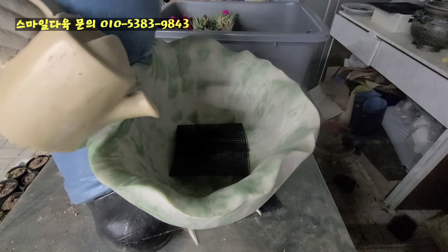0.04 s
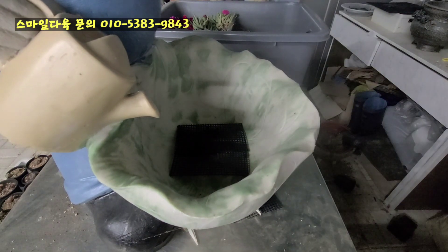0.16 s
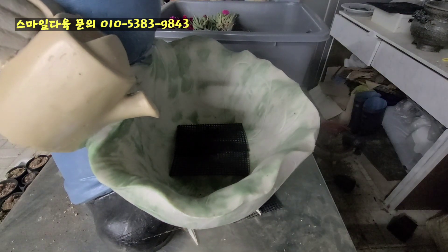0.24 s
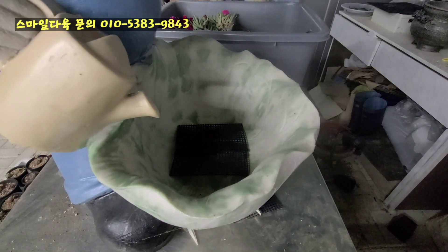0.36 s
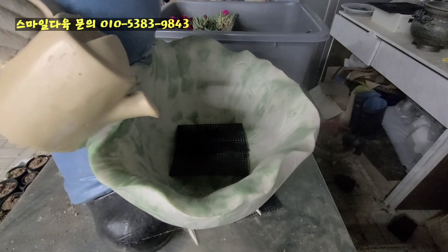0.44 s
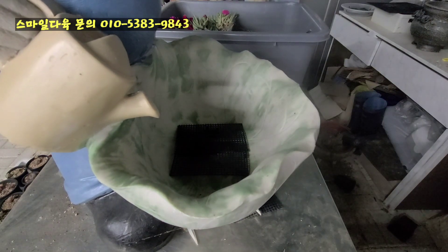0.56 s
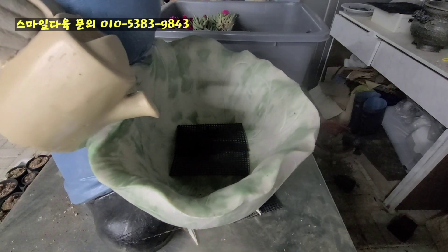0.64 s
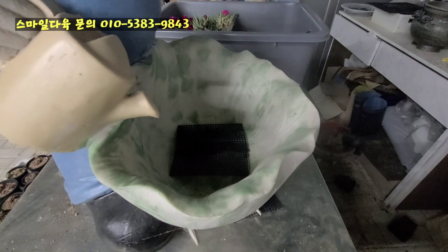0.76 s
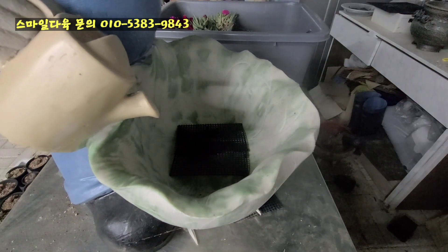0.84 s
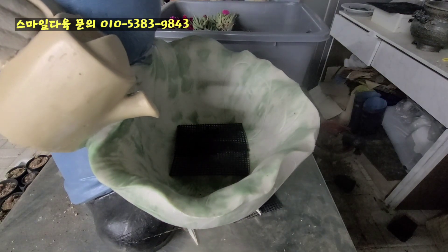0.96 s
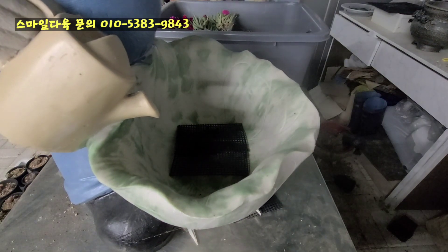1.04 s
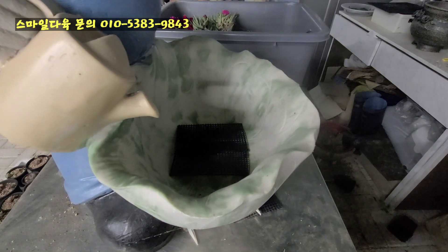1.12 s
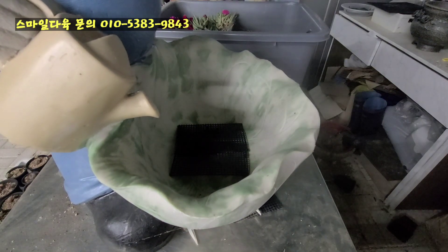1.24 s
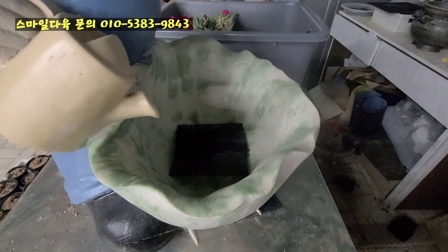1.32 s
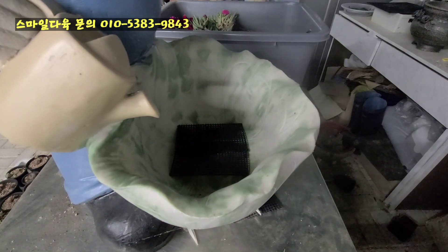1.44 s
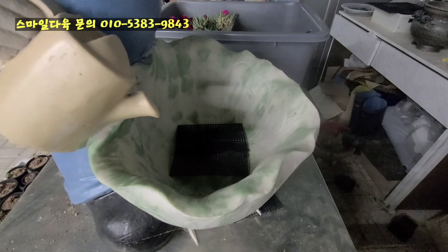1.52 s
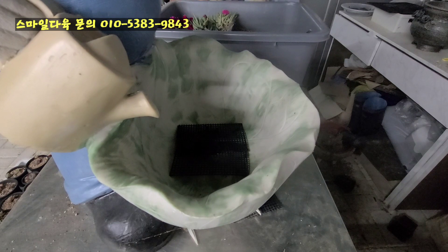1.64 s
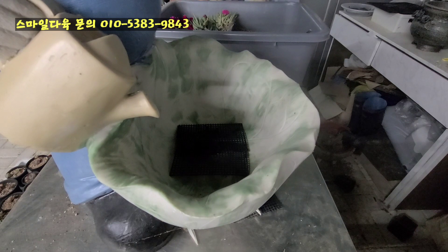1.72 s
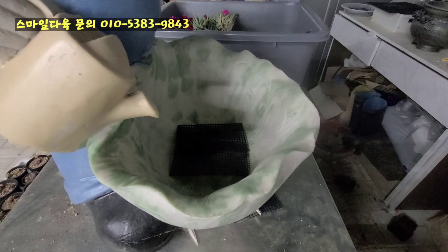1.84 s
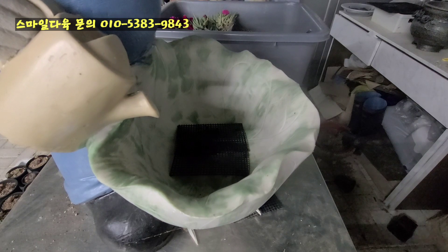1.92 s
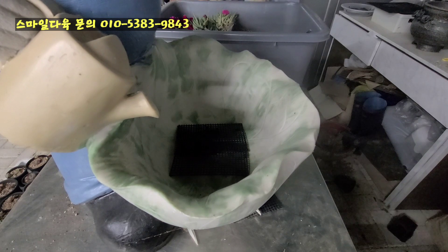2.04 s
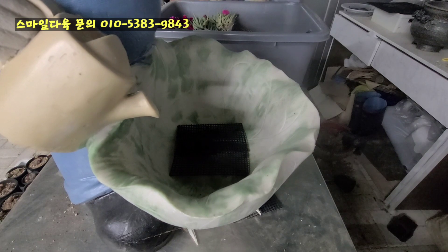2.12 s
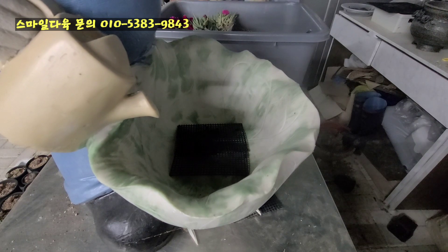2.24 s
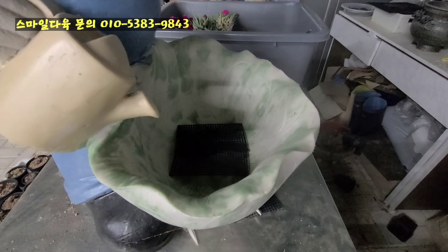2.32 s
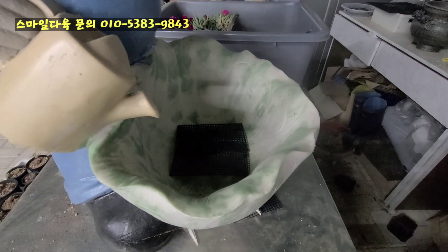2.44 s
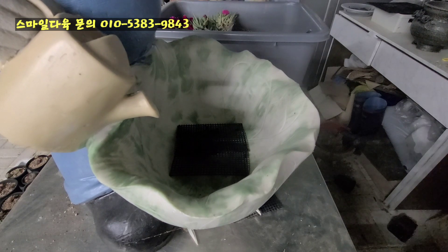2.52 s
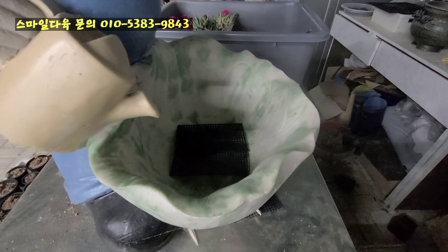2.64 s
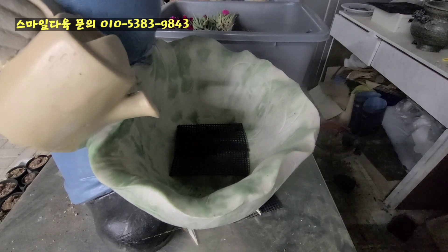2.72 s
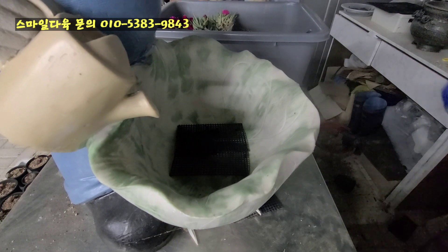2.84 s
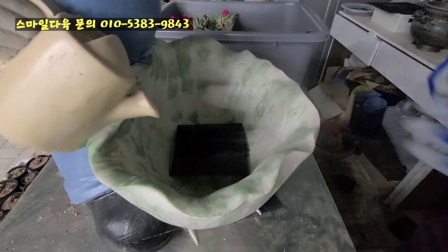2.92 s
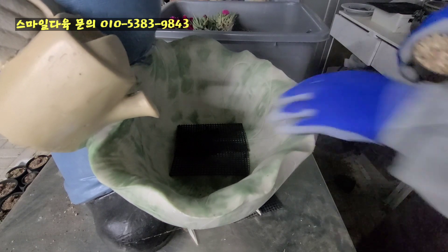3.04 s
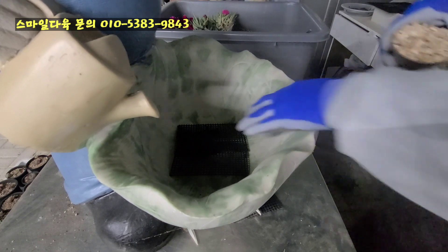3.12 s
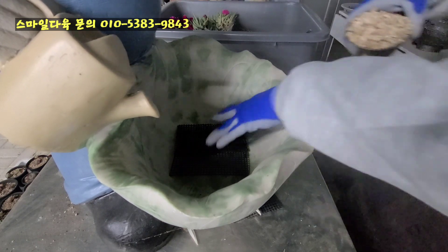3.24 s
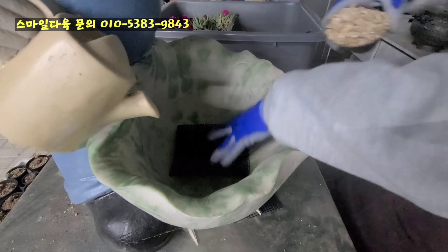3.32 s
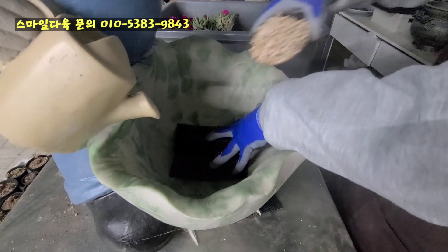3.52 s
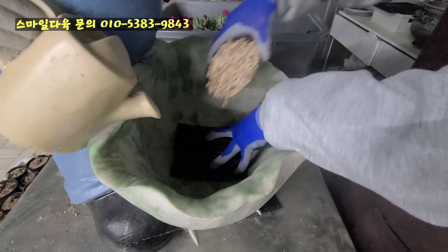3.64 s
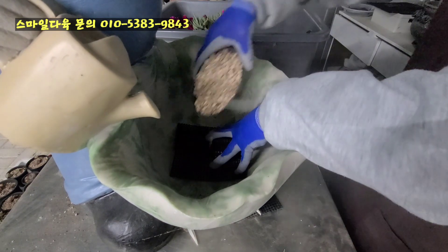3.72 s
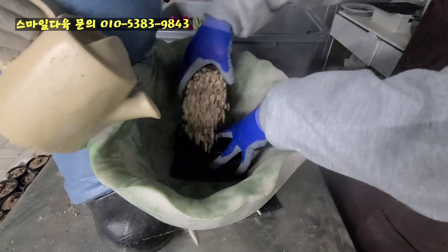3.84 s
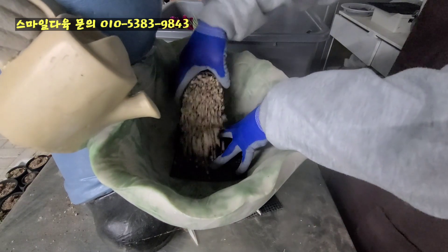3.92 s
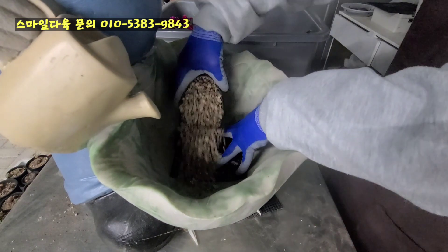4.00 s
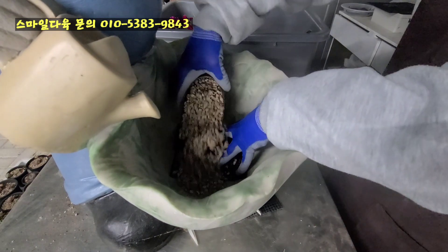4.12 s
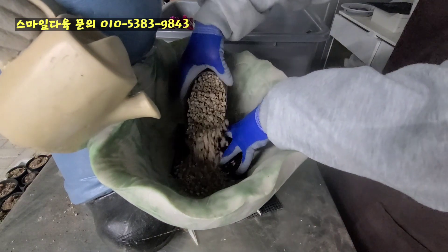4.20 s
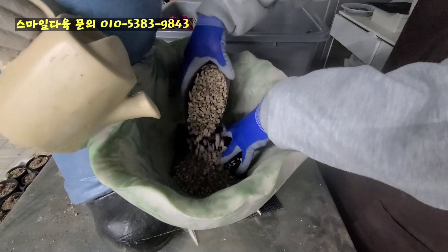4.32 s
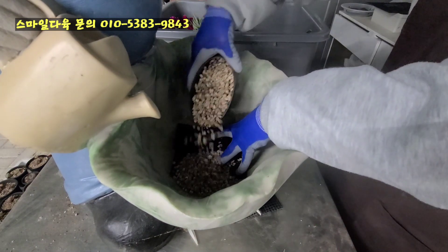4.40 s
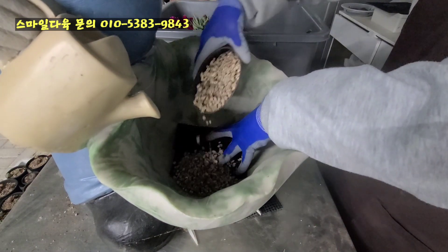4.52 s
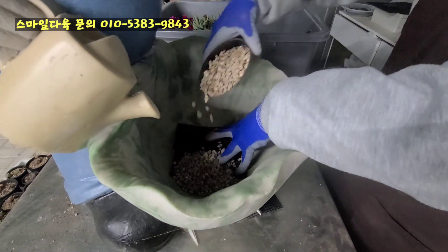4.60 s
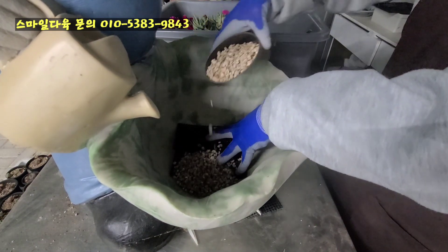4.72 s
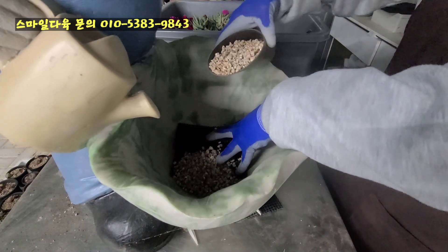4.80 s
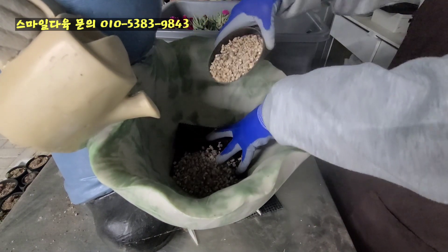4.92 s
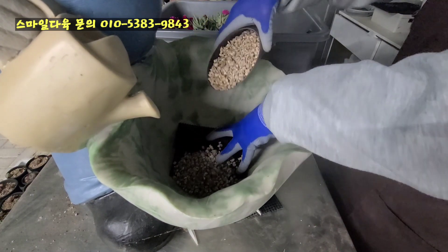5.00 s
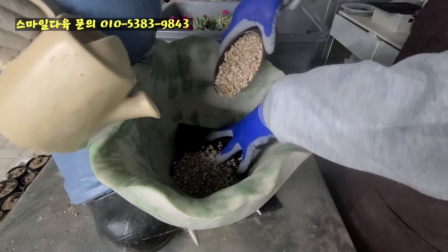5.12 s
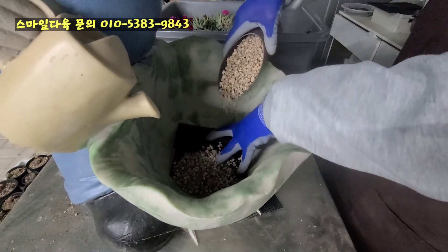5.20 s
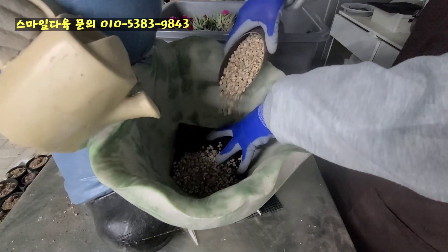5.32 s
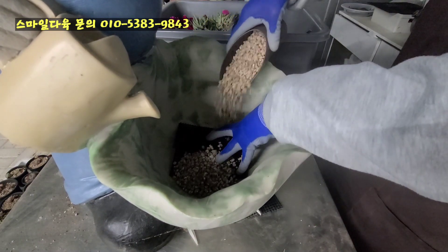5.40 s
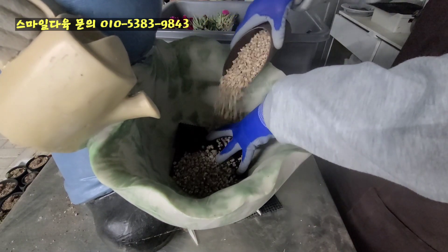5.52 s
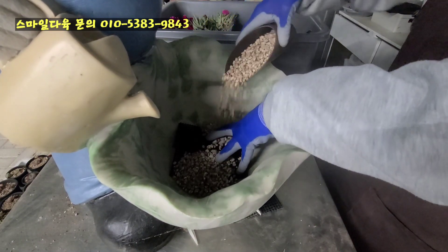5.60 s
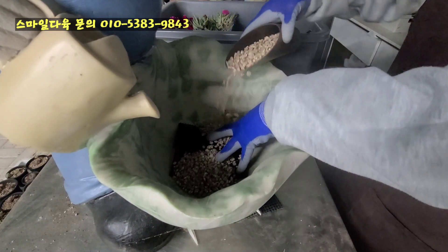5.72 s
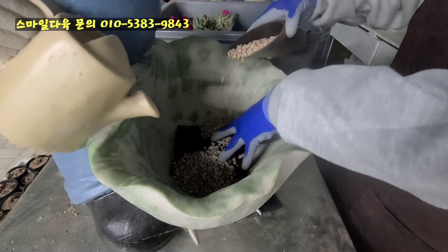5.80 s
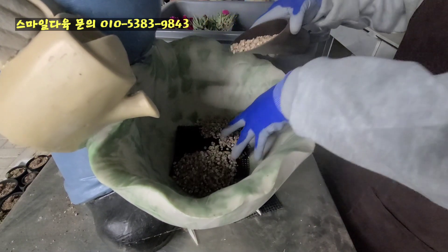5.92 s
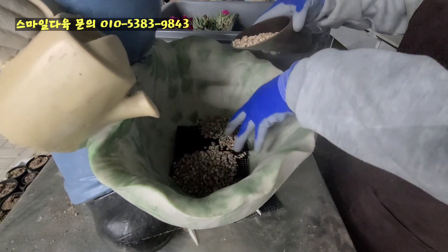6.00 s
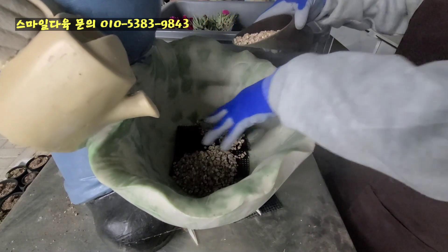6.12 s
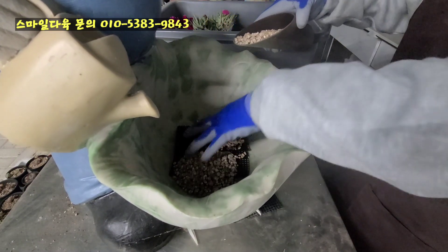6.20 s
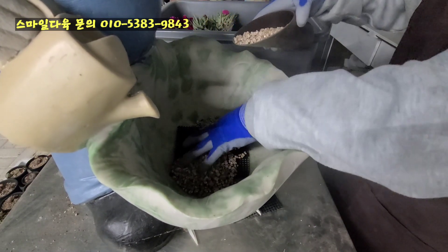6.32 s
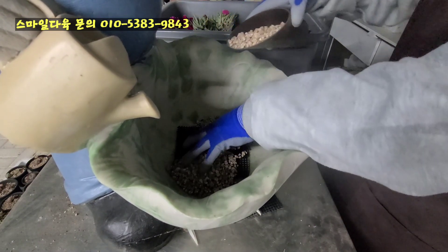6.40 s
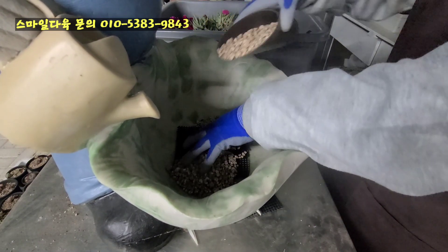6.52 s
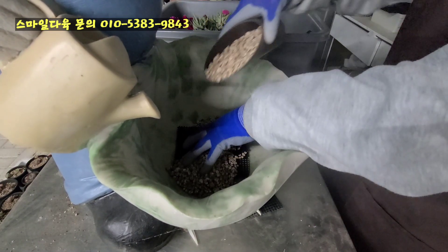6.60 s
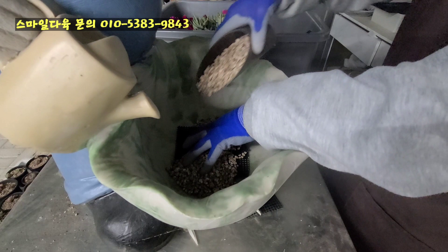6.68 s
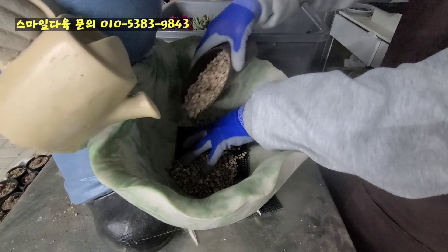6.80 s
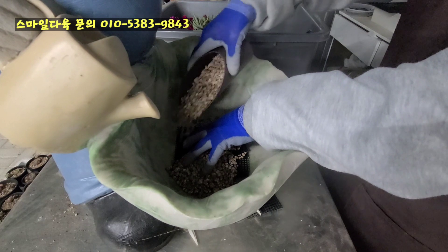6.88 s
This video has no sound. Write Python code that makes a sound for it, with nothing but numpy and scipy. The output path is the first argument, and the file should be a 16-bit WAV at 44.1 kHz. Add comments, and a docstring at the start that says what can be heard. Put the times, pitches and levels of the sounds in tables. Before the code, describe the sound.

Close stereo sound in a small workroom, with short sparse reflections and a low, steady, dull rumble. At about 0.25 s a scoop stabs into a tub of coarse grit: loud crunching and grinding with hollow bumps until 0.55 s, dragging out and fading past 1 s. At 1.2-1.3 s the scoop is shaken and rapped, a short, bright, hard tick. From 1.5 to 3.2 s it is nearly quiet, with faint settling and sparse tiny stone clicks. A glove brushes softly at 3.2 and 3.4 s with a light knock. At 3.8 s dull ceramic knocks start a dense rattling, hissing pour, strongest around 4.0-4.2 s; more knocks come near 4.4-4.5 s, then trickles. A second pour swells from 5.2 to 5.5 s, followed by bright scattered stone clicks until 6.0 s. Around 6.2-6.5 s there are soft brushes and ticks, then a weaker pour from 6.8 s to the end.

```python
"""Grit scooped into a planter

A small workroom, heard up close by a stereo microphone with two ports.
A scoop digs into a tub of coarse grit: filtered stone contacts rumble and crunch, and struck modes bump.
It pours run after run into a large ceramic planter: contacts hiss through its hollow, stray stones click.
A gloved hand, holding the drain mesh, brushes (shaped noise) and knocks (damped modes) the planter.
Sparse reflections and low, steady room noise lie behind it all."""
import sys
import numpy as np
from scipy import signal
from scipy.fft import rfft, irfft, next_fast_len
from scipy.io import wavfile
from scipy.ndimage import uniform_filter1d

SR = 44100
rng = np.random.default_rng(int(sys.argv[2]) if len(sys.argv) > 2 else 0)


def persist_wave(psi):
    """Save psi, clipped to +-1, as 16-bit WAV."""
    counts = np.round(np.clip(psi, -1, 1) * 32767).astype(np.int16)
    wavfile.write(sys.argv[1], SR, np.atleast_2d(counts).T)


N = 306495
TIME = np.arange(N) / SR

# moves of the scoop in the tub: it stabs in, bites deeper, shoves, ploughs, drags out and is shaken level;
# then loose stones run off, clumps drop back, and the load settles and shifts as it is carried:
# (start [s], rise [s], hold [s], release [s], push level [dB], grinding level [dB], crunch level [dB])
SCOOP_MOVES = [ (0.242, 0.068, 0.022, 0.16, -23.5, -21.5, -23), (0.318, .022, .036, 0.13, -23, -18.5, -30),
               (0.47, 0.066, .075, 0.23, -24.5, -24, -28.5), (0.68, .14, 0.034, 0.38, -26, -26.5, -30.5),
               (1.0, 0.04, 0.2, 0.16, -40, -42.5, -41.5), (1.224, 0.018, 0.054, 0.13, -41.5, -48.5, -32),
               (1.35, 0.023, .27, 0.19, -54.5, -50.5, -45.5), (1.475, 0.022, 0.034, 0.1, -54, -47, -39.5),
               (1.855, 0.0053, 0.0081, 0.021, -50, -49, -55), (1.8, .02, 0.15, 0.87, -61, -60, -67.5),
               (2.58, 0.093, 0.094, 0.21, -72, -68, -69)]
# the tub's floor booming under the ploughing: (start [s], rise [s], hold [s], release [s], level [dB])
FLOOR_BOOM = [(0.245, .3, 0.36, 0.6, -36)]
# a shove bites at once and dies away evenly (exponents, no unit)
SHOVE_RISE_BEND, SHOVE_FALL_BEND = 0.48, 0.89
# broad colour of the digging: (frequency [Hz], level [dB per Hz])
DIG_COLOUR = [(29, -37.5), (50, -21.5), (79, -14), (135, -13), (321, -11.5), (418, -14.5), (765, -10),
              (884, -13.5), (1050, -8.5), (1270, -12.5), (5150, -26), (8140, -38.5), (14900, -26),
              (16000, -42)]
# hollow resonances of the tub, and one dip between them: (frequency [Hz], width [Hz], lift [dB])
TUB_RESONANCES = [(80, 20, 6.5), (130, 55, -11.5), (224.5, 32, 3.5), (323, 40, 4.5), (458, 48, 3),
                  (750, 40, 2.5), (805, 66, 4.5), (1000, 360, 2.5), (2490, 60, 4)]


def dig():
    """The scoop ploughs through packed stones: coarse slips shake the tub, fine contacts crunch above them."""
    push, grind, bite = swells(SCOOP_MOVES, SHOVE_RISE_BEND, SHOVE_FALL_BEND)
    boom, = swells(FLOOR_BOOM, SHOVE_RISE_BEND, SHOVE_FALL_BEND)
    speed = bite / bite.max()
    slips = grit(350 + 700 * speed, spread_db=1.0, clump_db=0.5, crack_s=0.00038, ring_db=1, scatter_db=-4.5)
    crunch = grit(250 + 7000 * speed, spread_db=4.3, clump_db=1.1, crack_s=0.0005, ring_db=10, scatter_db=-8)
    slips = colour(ports(slips, PORT_LIKENESS, lag_ms=0.12), DIG_COLOUR, TUB_RESONANCES)
    crunch = colour(ports(crunch, PORT_LIKENESS, lag_ms=0.12), DIG_COLOUR, TUB_RESONANCES)
    low = drive(slips, [boom, push, grind], [55, 135, 600, 1800])
    high = drive(crunch, [bite], [1800, 16500])
    return low + high


# spills of grit in the planter: runs off the tipped scoop and their trickles, stones shaken loose by
# knocks, the heap settling, and the hand spreading and patting it:
# (start [s], rise [s], hold [s], release [s], landing level [dB], sliding hiss level [dB], dust fizz level [dB])
GRIT_SPILLS = [ (3.79, 0.0014, .022, .02, -34.5, -39, -44.5), (3.82, 0.053, 0.13, .2, -48, -52.5, -62),
               (3.935, 0.11, .125, 0.42, -35.5, -35, -40.5), (4.515, 0.0062, 0.011, 0.058, -47, -46, -45),
               (4.62, 0.051, 0.19, 0.36, -59, -60, -68), (5.16, 0.22, .05, 0.12, -48, -47.5, -66),
               (5.28, 0.16, 0.2, .17, -35.5, -36.5, -41.5), (5.7, 0.06, 0.18, 0.26, -49.5, -43, -48),
               (6.19, 0.017, .08, 0.095, -68, -66, -77), (6.32, 0.071, 0.095, .06, -54, -52.5, -64),
               (6.54, 0.0086, 0.0036, 0.026, -50.5, -55.5, -59), (6.8, 0.21, .1, .2, -53, -52.5, -66),
               (6.885, 0.052, .1, .2, -43.5, -46, -54)]
# a spill gathers gradually and runs dry ever faster (exponents, no unit)
SPILL_RISE_BEND, SPILL_FALL_BEND = 1.02, 1.5
# broad colour of the pouring: (frequency [Hz], level [dB per Hz])
POUR_COLOUR = [(240, -48), (400, -16.5), (432, -7), (504, -24.5), (636, -13), (801, -1), (1040, -10),
               (1510, -10.5), (2430, -12.5), (4310, -8.5), (7630, -21.5), (14800, -7), (16000, -20)]
# hollow resonances of the planter, and one broad dip: (frequency [Hz], width [Hz], lift [dB])
PLANTER_HOLLOW = [(824, 41, 6), (1110, 40, 3), (1320, 120, 12.5), (1517, 147, 11.5), (1910, 25, 8),
                  (2926, 42, 8), (3440, 70, 3), (4190, 1000, -2)]


def pour():
    """Stones slide off the scoop and land in the planter, whose hollow rings; more flow, more contacts."""
    landing, hiss, fizz = swells(GRIT_SPILLS, SPILL_RISE_BEND, SPILL_FALL_BEND)
    flow = hiss / hiss.max()
    stream = grit(200 + 3600 * flow, spread_db=4.9, clump_db=1.4, crack_s=0.0005, ring_db=12, scatter_db=-12)
    stream = colour(ports(stream, PORT_LIKENESS, lag_ms=0.1), POUR_COLOUR, PLANTER_HOLLOW)
    return drive(stream, [landing, hiss, fizz], [380, 2200, 7500, 18000])


# the larger single stones: (time [s], level [dB], pitch [Hz], treble lift [dB])
SINGLE_STONES = [(1.3198, -25, 3000, 3), (1.636, -42, 4210, 18), (1.699, -42, 2330, -32),
                 (1.9852, -48, 3060, -18), (2.456, -49.5, 2700, -12), (2.612, -39, 3620, -26),
                 (2.6503, -49, 4150, -17), (2.7068, -44.5, 4270, -16.5), (2.7277, -44.5, 4420, -20),
                 (2.901, -52.5, 6410, 2), (2.957, -43.5, 4900, 16), (3.434, -47.5, 2530, 0),
                 (3.7912, -39, 3180, 14), (3.8576, -36.5, 3000, 1), (3.923, -34.5, 4420, 8),
                 (3.957, -39, 2640, 1), (4.1, -25, 4190, 13), (4.4504, -34.5, 2880, 9),
                 (4.617, -46, 2300, 3), (4.666, -42, 3270, 6.5), (4.7195, -44.5, 6240, 21),
                 (4.7438, -39, 6350, 7), (4.7853, -50, 4300, -8), (4.8223, -43.5, 3750, 12),
                 (4.92, -51, 3600, 10), (5.4075, -28.5, 3400, -5), (5.421, -37, 3390, 3),
                 (5.455, -31, 4200, 16.5), (5.641, -24, 5060, 12), (5.7285, -28.5, 4400, 15),
                 (5.7643, -29.5, 4300, 8), (5.7745, -30, 5200, 5), (5.8082, -28, 4800, 7),
                 (5.852, -27, 4170, 9), (5.875, -32, 4940, 16), (5.9277, -26, 4630, 10),
                 (5.9392, -27, 6340, 5), (5.9606, -25.5, 3780, 11), (6.041, -35.5, 4170, 14),
                 (6.1898, -36, 3980, 8), (6.3214, -49.5, 4350, -12), (6.4265, -33.5, 3770, 6),
                 (6.4477, -41, 3330, 4), (6.493, -42.5, 3740, 9)]
# broad colour of a stone's click: (frequency [Hz], level [dB])
STONE_COLOUR = [(300, -23), (900, -9), (1600, -3.5), (3500, 0), (6000, 1), (8000, -13), (11000, -8.5),
                (16000, -16.5)]
REBOUND_S, REBOUND_DB = 0.004, -6.5  # mean gap between rebounds [s], level change at each [dB]


def stones(count=3):
    """Larger stones click on the scoop and the glaze, each chattering in a few quick, weaker rebounds."""
    out = np.zeros((2, N))
    for s, db, hz, treble_db in SINGLE_STONES:
        tick, late_s = np.zeros((2, SR // 16)), 0
        for k in range(count):
            contact = click(hz, crack_s=0.0008, ring_db=5, scatter_db=-11, scatter_s=0.005)
            add(tick, late_s, amp(k * REBOUND_DB) * contact)
            late_s += REBOUND_S * rng.uniform(.5, 1.5)
        tick = colour(tick, STONE_COLOUR)
        tick = colour(tick, [(3800, 0.0067), (10500, treble_db)])
        loudest = np.sqrt(uniform_filter1d(tick.mean(0) ** 2, size=88).max())  # over 2 ms
        add(out, s, amp(db) * tick / loudest)
    return ports(out, PORT_LIKENESS)


# the scoop bumping the tub where packed stones give way:
# (time [s], ring peak level [dB], pitch that the blow favours [Hz], spread [octaves])
TUB_BUMPS = [(0.2435, -18, 420, 0.38), (0.279, -10, 335, 0.28), (0.402, -9.5, 950, 0.24),
             (0.541, -12, 800, 0.55)]


def tub_bumps():
    """The tub's resonances ring as damped modes, a wider resonance dying sooner."""
    modes = [(hz, db, np.log(1000) / (np.pi * width)) for hz, width, db in TUB_RESONANCES]
    return struck(TUB_BUMPS, modes, contact_s=0.00067, port_turn=0.45, thud_db=-2.5, thud_s=0.0035)


# knocks on the planter: (time [s], ring peak level [dB], pitch that the blow favours [Hz], spread [octaves])
PLANTER_KNOCKS = [(3.4335, -20.5, 905, 0.48), (3.7905, -20.5, 990, 0.26), (3.794, -14.5, 338, 0.21),
                  (3.805, -16, 259, 0.19), (4.377, -17, 412, 0.43), (4.516, -15, 410, 0.39),
                  (4.518, -28, 1180, 0.73), (4.822, -31.5, 1571, 0.43), (6.494, -40, 1290, 0.19)]
# modes of the planter when knocked: (frequency [Hz], relative level [dB], time to fall 60 dB [s])
PLANTER_MODES = [(202, 11.5, 0.027), (278, -5.5, 0.062), (309, -3.5, 0.078), (373, 7, 0.037),
                 (420.4, -4.5, 0.078), (550, -2, 0.027), (799, 7, 0.061), (817, 0, 0.045),
                 (1060, 9.5, 0.016), (1346, -0.5, 0.081), (1620, 1.5, 0.069), (1900, -29, 0.024),
                 (2320, -16, 0.053)]


def planter_knocks():
    """The ceramic wall answers a knock with short, damped modes."""
    return struck(PLANTER_KNOCKS, PLANTER_MODES, contact_s=0.0014, port_turn=0.25, thud_db=-12, thud_s=0.011)


# the scoop rapped as it is shaken level:
# (time [s], ring peak level [dB], pitch that the blow favours [Hz], spread [octaves])
SCOOP_RAPS = [(1.228, -24, 2500, .7), (1.241, -36, 2900, .6), (1.267, -35, 2400, .7),
              (1.289, -14, 2660, 0.35), (1.3195, -24.5, 2900, 0.42)]
# modes of the scoop: (frequency [Hz], relative level [dB], time to fall 60 dB [s])
SCOOP_MODES = [(1900, 0.5, 0.04), (2340, -29, 0.019), (2370, 9, 0.025), (2600, -4, 0.067), (2550, 3, 0.054),
               (3000, 2, 0.068), (3034, -2, 0.19), (3680, 3, 0.03), (5600, -1, 0.017)]


def scoop_raps():
    """A brief contact sets the scoop's high modes ringing, with hardly any thud."""
    return struck(SCOOP_RAPS, SCOOP_MODES, contact_s=0.0003, port_turn=0.82, thud_db=-32, thud_s=0.0027)


# the glove brushing past: (start [s], rise [s], hold [s], release [s], level [dB])
GLOVE_BRUSHES = [(3.208, 0.063, 0.014, 0.011, -48), (3.402, 0.034, .008, .025, -54.5),
                 (6.335, .055, .012, .015, -46.5)]
# colour of the fabric's hiss: (frequency [Hz], level [dB per Hz])
GLOVE_COLOUR = [(1060, -12), (1800, -8), (2740, -9), (2980, -4.5), (4060, -5.5), (8280, -19), (14600, -10),
                (16000, -8.5)]


def glove():
    """Fabric slides with a soft, fine hiss."""
    hiss = evened(colour(rng.standard_normal((2, N)), GLOVE_COLOUR))
    return hiss * swells(GLOVE_BRUSHES, rise_bend=0.78, fall_bend=0.72)


# the workroom's decay: (frequency [Hz], time to fall 60 dB [s])
ROOM_DECAY = [(150, 0.29), (600, 0.21), (2000, 0.17), (5000, 0.28), (14000, 0.18)]
# likeness of the room's sound at the two microphone ports: (frequency [Hz], likeness [0-1])
ROOM_LIKENESS = [(60, 0.99), (250, 0.88), (500, 0.5), (1000, 0.083), (3000, .05)]


def room(x):
    """Sparse reflections, each band dying at its own speed."""
    size = SR // 2
    taps = rng.standard_normal((2, size)) * (rng.random((2, size)) < 3000 / SR)  # about 3000 a second
    hz, t, z = signal.stft(taps, SR, nperseg=256)
    fade = np.exp(-np.log(1000) * t / read(ROOM_DECAY, hz)[:, None])
    tail = signal.istft(z * fade, SR, nperseg=256)[1]
    tail[:, :round(.005 * SR)] = 0  # nothing returns in the first 5 ms
    tail = ports(tail / np.linalg.norm(tail[0]), ROOM_LIKENESS)
    return signal.fftconvolve(x, tail, axes=1)[:, :N]


# colour of the room noise: (frequency [Hz], level [dB per Hz])
ROOM_COLOUR = [(15, -39.5), (25, -10), (56, -1), (127, -14), (153, -18.5), (270, -15), (344, -16),
               (463, -19.5), (818, -21), (962, -20), (1560, -30), (1890, -36), (7510, -60), (10400, -63.5),
               (16000, -51)]
ROOM_DB = -45  # level of the room noise [dB]


def room_noise():
    """A steady, dull rumble fills the room: coloured noise, alike at both ports only in the bass."""
    noise = ports(rng.standard_normal((2, N)), ROOM_LIKENESS)
    return amp(ROOM_DB) * evened(colour(noise, ROOM_COLOUR))


def click(hz, crack_s, ring_db, scatter_db, scatter_s, size=2048):
    """One stone contact: a rough crack with a brief ring at hz, then scatter from the walls close by."""
    t = np.arange(size) / SR
    crack = t / crack_s * np.exp(1 - t / crack_s)
    scatter = amp(scatter_db) * (np.exp(-t / scatter_s) - np.exp(-t / crack_s))
    burst = rng.standard_normal((2, size)) * (crack + scatter)
    ring = signal.lfilter(*signal.iirpeak(min(hz, SR / 3), 7, SR), burst)
    return burst + amp(ring_db) * ring


def grit(per_s, spread_db, clump_db, crack_s, ring_db, scatter_db, count=24):
    """A stream of contacts of many sizes and pitches, per_s of them a second, swelling in small clumps."""
    chance, kind = per_s / SR, rng.integers(0, count, N)
    knots = np.arange(0, TIME[-1], .012)  # a new clump level every 12 ms
    clumps = np.interp(TIME, knots, rng.standard_normal(len(knots)))
    size_db = spread_db * np.minimum(rng.exponential(1, N), 3) + clump_db * clumps
    sizes = amp(size_db) * rng.choice([-1, 1], N)
    hits = sizes * (rng.random(N) < chance) / np.sqrt(chance)  # a denser stream is no louder by itself
    pitches = np.geomspace(1800, 13000, count)
    contacts = [click(hz, crack_s, ring_db, scatter_db, .007) for hz in pitches]
    out = 0
    for k, contact in enumerate(contacts):
        out = out + signal.oaconvolve((hits * (kind == k))[None], contact, axes=1)[:, :N]
    return out


def struck(blows, modes, contact_s, port_turn, thud_db, thud_s):
    """A blow stirs the modes near its favoured pitch; each port meets a mode at its own phase."""
    out, t = np.zeros((2, N)), np.arange(SR // 3) / SR
    hz, mode_db, t60 = np.transpose(modes)[:, :, None]
    decay = np.exp(-np.log(1000) * t / t60)
    for s, db, pitch_hz, spread in blows:
        weight = amp(mode_db) * np.exp(-.5 * (np.log2(hz / pitch_hz) / spread) ** 2)
        angle = 2 * np.pi * hz * t + port_turn * rng.standard_normal((2, len(hz), 1))
        ring = (weight * decay * np.sin(angle)).sum(1) * (1 - np.exp(-t / contact_s))
        # many damped modes blur into a short thud around the same pitch
        thud = ports(rng.standard_normal((2, len(t))) * np.exp(-t / thud_s), PORT_LIKENESS)
        band = signal.butter(2, [pitch_hz / 1.6, pitch_hz * 1.6], "band", fs=SR, output="sos")
        thud = signal.sosfilt(band, thud)
        add(out, s, amp(db) * (ring / abs(ring).max() + amp(thud_db) * thud / abs(thud).max()))
    return out


def swells(rows, rise_bend, fall_bend):
    """Each move rises, holds, and falls 20 dB in its release time; one gain curve for each level column."""
    power = 0
    for start, rise, hold, release, *levels_db in rows:
        age = TIME - start
        attack = np.clip(age / rise, 0, 1) ** rise_bend
        fall_db = -20 * (np.maximum(age - rise - hold, 0) / release) ** fall_bend
        power = power + (amp(levels_db)[:, None] * attack * amp(fall_db)) ** 2
    return np.sqrt(power)


def drive(x, gains, edges_hz):
    """Each register of a stream is levelled, then swells and fades with its own gain."""
    out = np.zeros((2, N))
    for gain, lo, hi in zip(gains, edges_hz, edges_hz[1:]):
        band = signal.sosfilt(signal.butter(3, [lo, hi], "band", fs=SR, output="sos"), x)
        power = uniform_filter1d(uniform_filter1d(band.mean(0) ** 2, size=3000), size=3000)
        out += band / np.sqrt(abs(power) + 1e-6 * power.mean()) * gain
    return out


# likeness of close sounds at the two microphone ports: (frequency [Hz], likeness [0-1])
PORT_LIKENESS = [(60, .98), (250, .98), (550, .8), (800, .93), (1300, .62), (3000, .35), (8000, .1)]


def ports(x, likeness, lag_ms=0):
    """Two close ports are most alike in the bass and differ in the treble; the right may hear later by a lag."""
    size = next_fast_len(x.shape[1] + 2048)
    hz, (a, b) = np.fft.rfftfreq(size, 1 / SR), rfft(x, size)
    c = np.clip(read(likeness, hz), 0, 1)
    late = np.exp(-2j * np.pi * hz * lag_ms / 1000)
    right = late * (c * a + np.sqrt(1 - c ** 2) * b)
    return irfft(np.array([a, right]), size)[:, :x.shape[1]]


def colour(x, tone, hollows=(), size=8192):
    """Causal filter: a broad spectrum with narrow resonances standing on it."""
    hz = np.fft.rfftfreq(size, 1 / SR)
    db = read(tone, hz) + sum(lift / (1 + (2 * (hz - f) / width) ** 2) for f, width, lift in hollows)
    log_gain = np.log(amp(np.maximum(db, -100)))
    circle = np.concatenate([log_gain, log_gain[-2:0:-1]])
    # minimum phase: the phase follows from the log gain
    taps = np.fft.ifft(np.exp(np.conj(signal.hilbert(circle)))).real[:size // 2]
    return signal.oaconvolve(x, taps[None], axes=1)[:, :x.shape[1]]


def amp(db):
    """Decibels to gain."""
    return 10 ** (np.asarray(db) / 20)


def read(points, hz):
    """A table's value at hz, on a log-frequency axis."""
    f, value = np.transpose(points)
    return np.interp(np.log(hz + 1), np.log(f + 1), value)


def evened(x):
    """A stereo sound with its middle at unit power."""
    return x / np.sqrt(np.mean(x.mean(0) ** 2) + 1e-20)


def add(mix, s, sound):
    """Lays a stereo sound into the mix at time s."""
    part = mix[:, round(s * SR):][:, :sound.shape[1]]
    part += sound[:, :part.shape[1]]


def scene():
    """Grit, scoop, tub, planter and glove up close, their reflections and the room noise behind."""
    streams = dig() + pour() + glove()
    clicks = stones()
    blows = tub_bumps() + planter_knocks() + scoop_raps()
    echo = room(amp(-6.5) * streams + amp(-13) * clicks + amp(-4.5) * blows)
    return streams + clicks + blows + echo + room_noise()


# colour of the left microphone port against the right: (frequency [Hz], left minus right [dB])
PORT_COLOUR = [(100, .6), (320, -.3), (600, 2.2), (1100, 2.6), (2000, 1.3), (5500, .4), (8200, -6),
               (10500, -2), (15000, 0)]
EDGE_HZ = 15750  # upper band limit [Hz]


def record(dry):
    """Each microphone port has its own colour; then the band limit."""
    left = colour(dry[:1], [(hz, db / 2) for hz, db in PORT_COLOUR])
    right = colour(dry[1:], [(hz, -db / 2) for hz, db in PORT_COLOUR])
    edge = signal.firwin(511, EDGE_HZ, window=("kaiser", 9), fs=SR)
    return signal.oaconvolve(np.vstack([left, right]), edge[None], "same", axes=1)


dry = scene()
out = record(dry)
persist_wave(out)
```